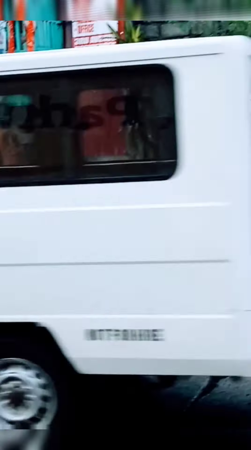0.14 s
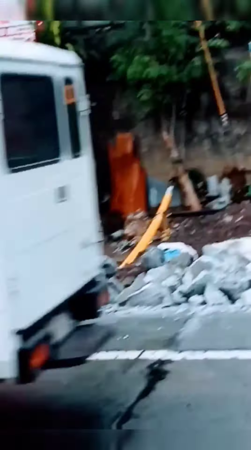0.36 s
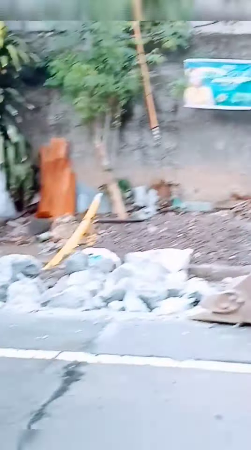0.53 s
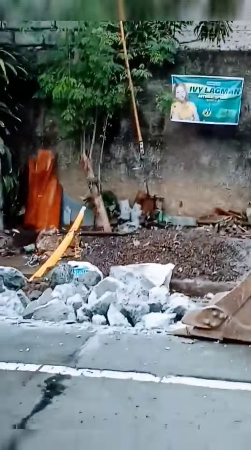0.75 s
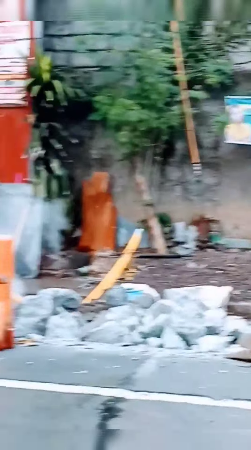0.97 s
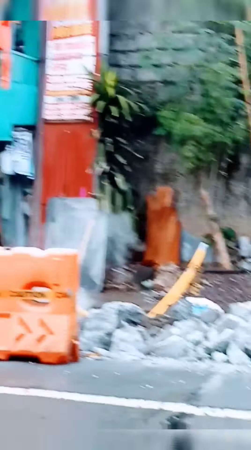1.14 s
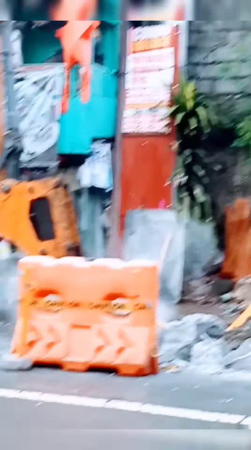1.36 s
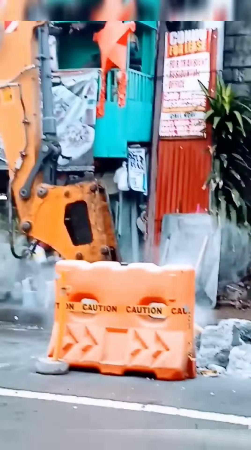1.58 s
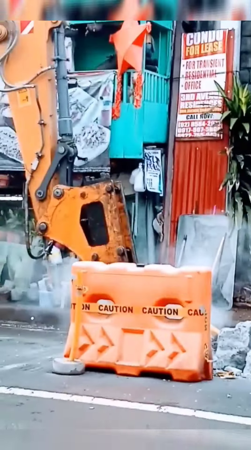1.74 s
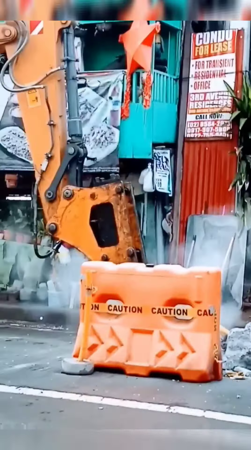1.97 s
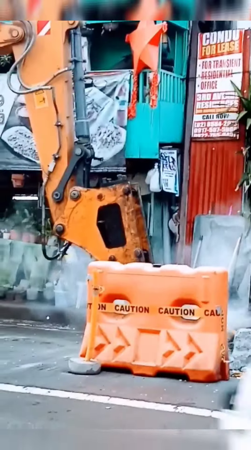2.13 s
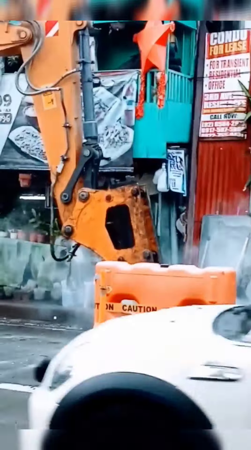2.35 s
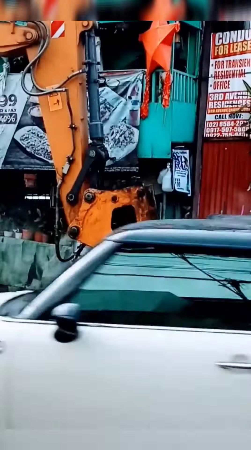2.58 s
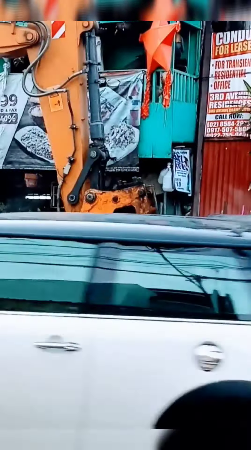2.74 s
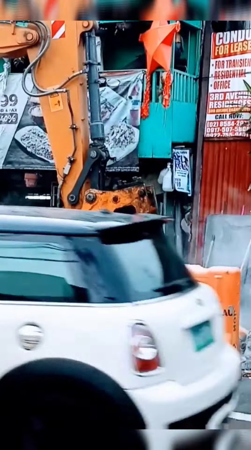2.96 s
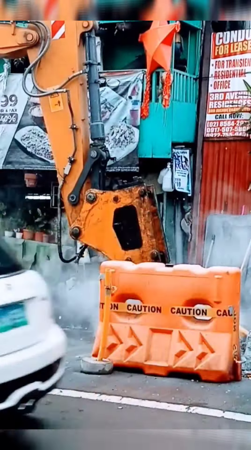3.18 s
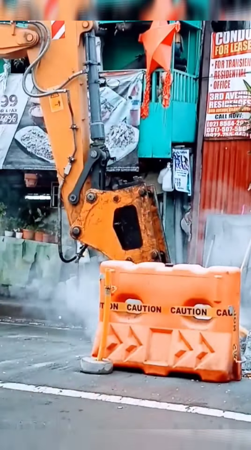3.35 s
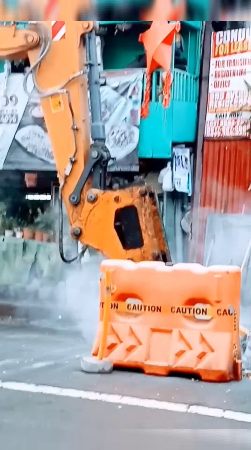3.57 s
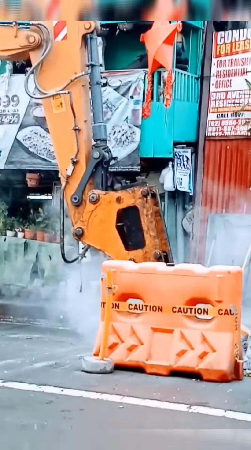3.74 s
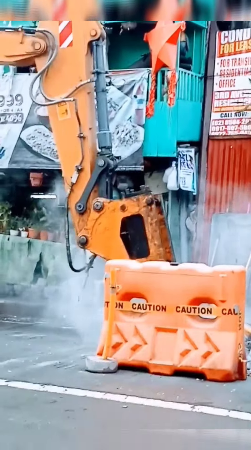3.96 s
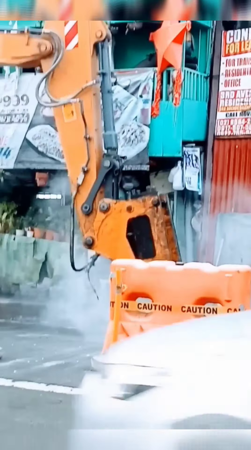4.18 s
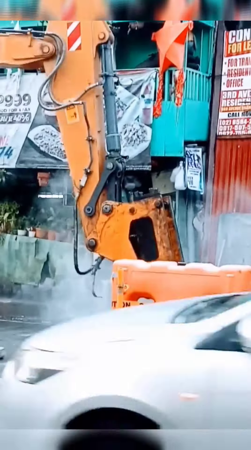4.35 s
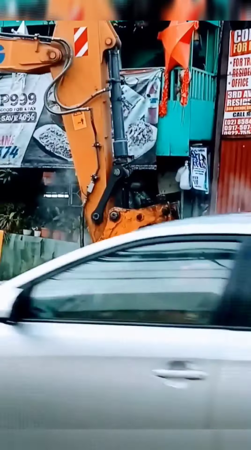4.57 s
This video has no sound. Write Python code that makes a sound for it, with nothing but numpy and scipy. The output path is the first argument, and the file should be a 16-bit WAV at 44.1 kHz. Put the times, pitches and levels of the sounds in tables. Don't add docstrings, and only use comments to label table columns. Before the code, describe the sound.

Low engine rumble and passing tyres open briefly, then a breaker pounds nine fast blows, pauses, pounds eight more, pauses again, and continues in shorter, uneven groups with bouncing rebounds, ending on two separated hits. Hard walls return each impact almost at once. Close, loud and distorted on a small outdoor microphone, with the traffic dipping while the tool works.

```python
import sys
import numpy as np
from scipy import signal
from scipy.fft import rfft, irfft, next_fast_len
from scipy.io import wavfile
from scipy.ndimage import uniform_filter1d

SR = 44100
rng = np.random.default_rng(int(sys.argv[2]) if len(sys.argv) > 2 else 0)


def dump_mix(stems):
    frames = np.atleast_2d(stems).T
    limited = np.clip(frames, -1, 1)
    pcm = np.round(limited * 32767).astype(np.int16)
    wavfile.write(sys.argv[1], SR, pcm)


def invert_db(x):
    u = np.asarray(x, float) / 20
    return 10 ** u


N = 252252


def evened(x):
    return x / np.sqrt(np.mean(x ** 2) + 1e-20)


def read(points, hz):
    f, value = np.transpose(points)
    return np.interp(np.log(hz + 1), np.log(f + 1), value)


def add(mix, s, sound):
    part = mix[round(s * SR):][:len(sound)]
    part += sound[:len(part)]


def coloured(x, shape):
    size = next_fast_len(N + 4096)
    gain = invert_db(read(shape, np.fft.rfftfreq(size, 1 / SR)))
    return irfft(rfft(x, size) * gain, size)[:N]


def wash(shape, patchy_db, swell_db):
    frames, hz = N // 256 + 5, np.fft.rfftfreq(1024, 1 / SR)
    a, b, patches = rng.standard_normal((frames, 513, 3)).T
    patches = evened(uniform_filter1d(uniform_filter1d(patches, 10, 0), 12, 1))
    swell = evened(uniform_filter1d(rng.standard_normal(frames), 8))
    level_db = read(shape, hz)[:, None] + patchy_db * patches + swell_db * swell
    z = (a + 1j * b) * invert_db(level_db)
    return evened(signal.istft(z, nperseg=1024, noverlap=768)[1][:N])


def street():
    # time in seconds, level in dB.
    loudness = [(0, -22), (.2, -22), (0.442, -22.5), (1.378, -31), (1.5, -31.5), (1.7, -30), (1.85, -25),
                (2.101, -23), (2.95, -33), (3.3, -33.5), (3.5, -35), (3.7, -34), (4.36, -29), (4.52, -25),
                (5.16, -29.5), (5.36, -23.5), (5.62, -22.5), (5.72, -32.5)]
    # frequency in Hz, level in dB per Hz.
    rumble_shape = [(12, -32), (20, -24), (54, -13), (80, -8), (97, 7.5), (130, -4.5), (178, 0),
                    (243, -5.5), (343, -5.5), (462, -13), (700, -27), (910, -50), (1540, -120)]
    # frequency in Hz, level in dB.
    roar_shape = [(240, -54), (400, -10.5), (668, -8), (1100, -4.5), (1460, -10.5), (1750, -8.5),
                  (2710, -16), (3540, -21.5), (4150, -26.5), (5200, -49), (6500, -52), (9500, -51),
                  (11000, -59), (16000, -55)]
    firing_hz, firing_db = 31.4, -9
    roar_db, roar_follows, busy_db = -30, 0.91, -22.5

    level_db = np.interp(np.arange(N) / SR, *np.transpose(loudness))
    wobble = evened(uniform_filter1d(rng.standard_normal(N), 4000))
    turns = np.cumsum(firing_hz * (1 + 0.039 * wobble)) / SR
    firings = np.diff(np.floor(turns), prepend=0) * invert_db(1.4 * rng.standard_normal(N))
    exhaust = evened(coloured(rng.standard_normal(N), rumble_shape))
    engine = invert_db(firing_db) * evened(coloured(firings, rumble_shape))
    roar = wash(roar_shape, patchy_db=1.6, swell_db=.6)
    roar_level_db = roar_db + roar_follows * (level_db - busy_db)
    return invert_db(level_db) * evened(exhaust + engine) + invert_db(roar_level_db) * roar


def footing(s, db, thump_db, echo_db):
    # start in seconds, crack of stone in dB,
    # street tail in dB, sag of the tail in dB per second, tool ring in dB.
    bursts = [
        (0.4, -10.5, -9, 8, 5),
        (2.1, -11, -8.5, 10, 4.5),
        (3.7, -10.5, -10.5, 20, 6),
        (4.05, -7.5, -13.5, 17, 1.5),
        (4.5, -7.5, -10, 0, 13),
        (5.0, -8.5, -7.5, 2, -26),
        (5.35, -7, -11.5, 1, 3),
        (5.5, -8, -9, -1, -9),
    ]
    usual_db = -9
    start, crack_db, tail_db, sag, ring_db = [b for b in bursts if b[0] <= s][-1]
    crack_db = crack_db + 0.17 * (usual_db - db) - 0.28 * echo_db
    ring_db = ring_db + 0.76 * (max(thump_db, 2 * usual_db) - usual_db)
    return s, db, thump_db, crack_db, echo_db, tail_db - sag * (s - start) - db, ring_db


def resonate(x, hz, width):
    r = np.exp(-np.pi * max(width, 1) / SR)
    gain = (1 - r * r) / 2
    return signal.lfilter([gain, 0, -gain], [1, -2 * r * np.cos(2 * np.pi * hz / SR), r * r], x)


def body(x, modes):
    detune = 1 + .035 * rng.standard_normal(len(modes))
    total = 0
    for k, ((hz, width, db), d) in enumerate(zip(modes, detune)):
        once = resonate(x, hz * d, 1.4 * width)
        twice = resonate(once, hz * d, 1.4 * width)
        total = total + (-1) ** k * invert_db(db) * twice
    return evened(total) * np.std(x)


def arrivals(t, direct_db, direct_t60, echo_db, tail_db, tail_t60):
    echo_s, echo_lasts_s = .0235, .03
    far_s = .088
    direct = np.clip(t / 0.0032, 0, 1) * invert_db(direct_db - 60 * np.maximum(t, 0) / direct_t60)
    late = np.maximum(t - echo_s, 0)
    facets = .8 * invert_db(-60 * np.maximum(late - echo_lasts_s, 0) / .06 - 110 * late)
    flat_face = .9 * invert_db(-60 * late / .06)
    wall = np.clip(late / .002, 0, 1) * (facets + flat_face)
    beyond = np.maximum(t - far_s, 0)
    step_db = -4 * np.clip(beyond / .008, 0, 1) - 70 * beyond
    tail = np.clip(t / .03, 0, 1) * invert_db(tail_db + step_db - 60 * t / tail_t60)
    return np.sqrt(direct ** 2 + (invert_db(echo_db) * wall) ** 2 + tail ** 2)


def blow(s, db, thump_db, crack_db, echo_db, tail_db, ring_db):
    # frequency in Hz, width in Hz, level in dB.
    ground_modes = [(104, 81, -0.5), (182.4, 58, -1.5)]
    slab_modes = [(258, 62, 3), (396, 185, -4), (685, 100, -5.5)]
    housing_modes = [(858, 178, -3.5), (1025.5, 111, 1), (1204, 140, -4)]
    plate_modes = [(1320, 410, -7.5), (1625, 177, -0.5), (1807, 198, -1.5)]
    stone_modes = [(2092, 393, 3.5), (2620, 215, 5.5), (3056, 650, -4.5), (4180, 900, -7)]
    tool_modes = [(3973, 55, -13), (5350, 80, -21), (5980, 40, -21), (6500, 200, -27), (7460, 22, -9),
                  (7650, 150, -20), (8150, 150, -19), (8850, 70, -18), (9250, 150, -24)]
    ground_lead_s = .006
    swing_s = .003

    early = np.arange(round(SR / 2)) / SR
    t = early - ground_lead_s
    noise, lumps = rng.standard_normal((2, 6, len(t)))
    noise = noise * invert_db(1.8 * evened(uniform_filter1d(lumps, 130)))

    ground = body(noise[0] * arrivals(early, 1.6, 0.11, echo_db - 9.0, tail_db - 8.5, 1.0), ground_modes)
    slab = body(noise[1] * arrivals(early, -2.6, 0.18, echo_db - 4, tail_db - 5.0, 0.98), slab_modes)
    low = invert_db(thump_db + 6.5) * (invert_db(-2) * ground + slab)

    housing = body(noise[2] * arrivals(t, 3, .075, echo_db - 4, tail_db - 4, .7), housing_modes)
    plates = body(noise[3] * arrivals(t, -5.0, 0.17, echo_db - 2.5, tail_db - 4.5, 0.96), plate_modes)

    crack = noise[4] * arrivals(t, -1.25, 0.19, echo_db - .7, tail_db - 0.15, 0.79)
    high = invert_db(crack_db + 2.0) * (body(crack, stone_modes) + invert_db(-6.0) * crack)

    rattle = noise[5] * arrivals(t, -1, .12, -6, -2, .9)
    tool = sum(invert_db(d) * resonate(rattle, hz, w) * np.sqrt(SR / w) / 10 for hz, w, d in tool_modes)
    waver = evened(uniform_filter1d(lumps[5], 1500))
    tool = tool * invert_db(ring_db - 2 + 4 * waver)
    return s - ground_lead_s - swing_s, invert_db(db - 2) * (low + housing + plates + high + tool)


def tick(s, db, hz):
    t = np.arange(2500) / SR
    burst = rng.standard_normal(len(t)) * invert_db(-60 * t / 0.17)
    burst = resonate(resonate(burst, hz, 3000), hz, 3000)
    return s, invert_db(db - 12.5) * burst / abs(burst).max()


def scene():
    # time in seconds, strength in dB, ground thump in dB, wall echo in dB.
    blows = [(0.447, -11, -5.5, -2), (0.564, -9, -9, -1), (0.671, -7, -11, -3), (0.773, -6, -10.5, -3),
             (0.874, -6.5, -7.5, -3), (0.973, -9, -5, 1), (1.072, -10.5, -2.5, 2.5), (1.175, -10, -0.5, -7),
             (1.28, -14, -2, 0.5), (2.129, -8, -6, -17.5), (2.239, -5, -10, -12), (2.344, -6.5, -16.5, -7),
             (2.451, -7.5, -12, -9.5), (2.555, -5.5, -14.5, -4.5), (2.661, -8, -6.5, -3),
             (2.762, -11, -5.5, 0.5), (2.86, -14, -3, -1), (3.712, -8, -4.5, -3.5),
             (3.836, -12, -0.5, -3.5), (3.945, -13, -1.5, -4), (4.059, -9, -8.5, -20),
             (4.178, -5, -9, -10.5), (4.289, -14.5, -6.5, -0.5), (4.537, -9, -7, -4),
             (4.669, -10.5, -5.5, -3), (4.776, -12, -39, 1), (4.889, -11, -8.5, -0.5),
             (5.027, -12.5, -8, 0.5), (5.371, -6.5, -10, -9), (5.52, -8.5, -12, -2)]
    # time in seconds, strength in dB, wall echo in dB, street tail in dB.
    rebounds = [
        (3.994, -27.5, 6.5, -14),
        (4.029, -16.5, -13, 4.5),
        (4.618, -16, -0.5, -10),
        (4.743, -15, -22, 2),
    ]
    # time in seconds, level in dB, pitch in Hz.
    ticks = [(1.71, -31, 2730), (3.1757, -40, 2610), (3.1984, -43, 2550), (3.217, -29, 2720),
             (3.2444, -32, 2730), (3.2743, -18.5, 2500), (3.2849, -46, 2650), (3.296, -25, 3020),
             (3.3278, -44, 2650), (3.7, -17, 4000), (4.515, -13, 4020), (5.2754, -27, 2570),
             (5.3497, -17.5, 2620), (5.496, -6, 2950)]
    # frequency in Hz, gain in dB.
    mic_response = [(30, -14), (80, 0), (4000, 0), (4750, -5), (5400, -22), (9300, -24), (9900, -36),
                    (16000, -46)]

    breaker = np.zeros(N)
    for row in blows:
        add(breaker, *blow(*footing(*row)))
    for s, db, echo_db, tail_db in rebounds:
        add(breaker, *blow(s, db, -1, -6, echo_db, tail_db, ring_db=8))
    for row in ticks:
        add(breaker, *tick(*row))
    return (coloured(breaker, mic_response) + street())[None]


def band_limit(x):
    return signal.sosfilt(signal.butter(12, 15890, fs=SR, output="sos"), x)


def record(dry):
    self_noise_db, overload = -73, .715
    noisy = dry + invert_db(self_noise_db) * rng.standard_normal(dry.shape)
    clipped = noisy / (1 + abs(noisy / overload) ** 30) ** (1 / 30)
    return band_limit(clipped)


dry = scene()
out = record(dry)
dump_mix(out)
```